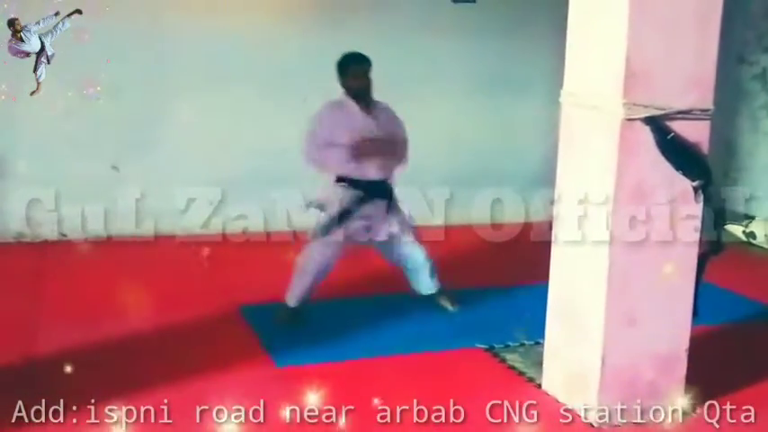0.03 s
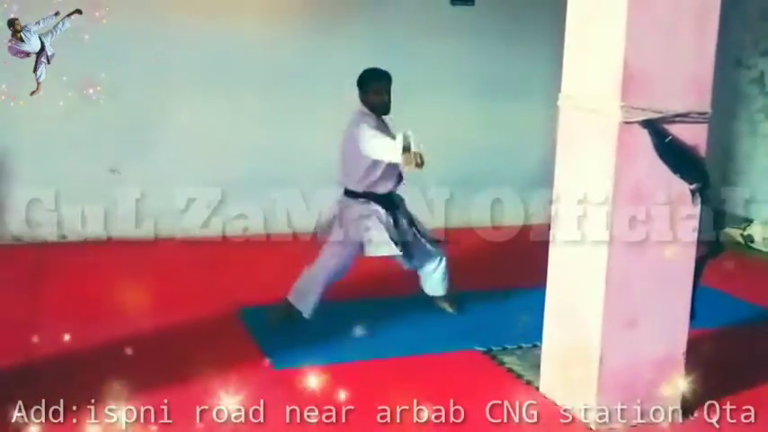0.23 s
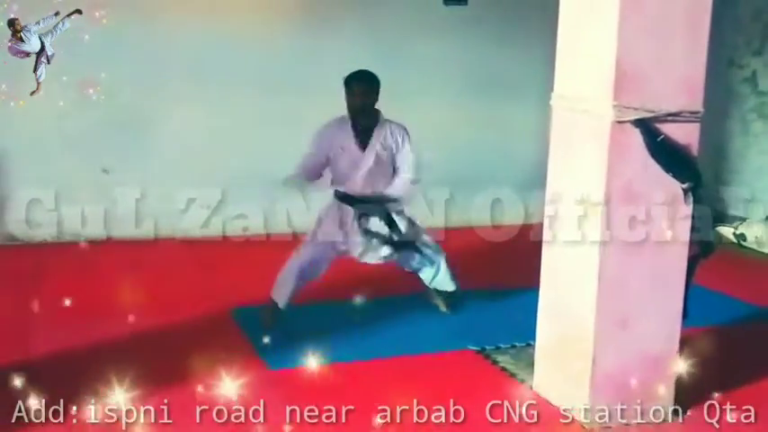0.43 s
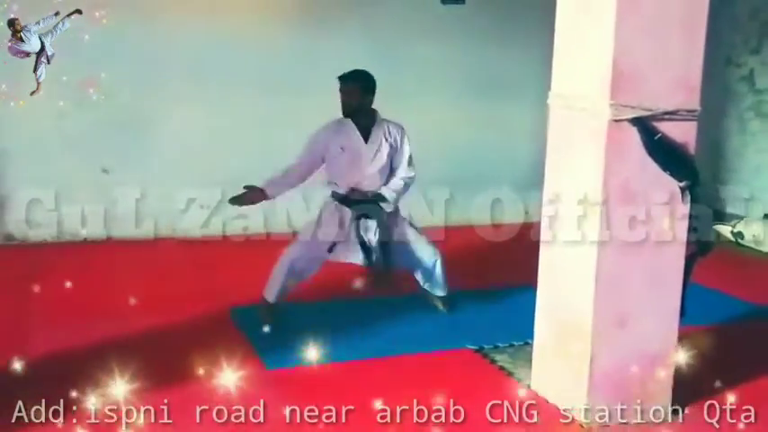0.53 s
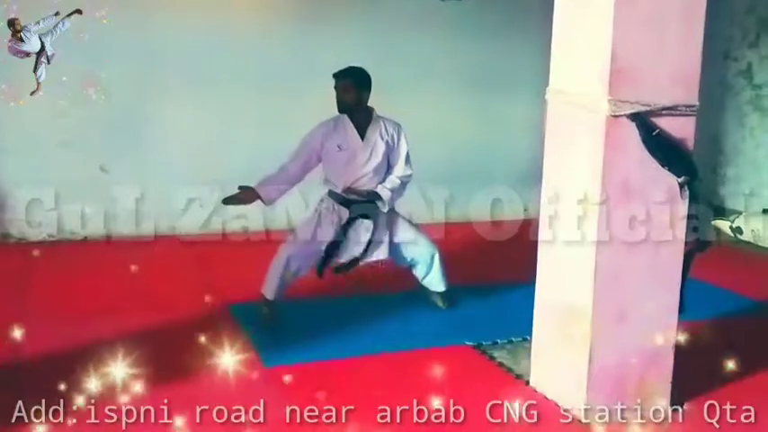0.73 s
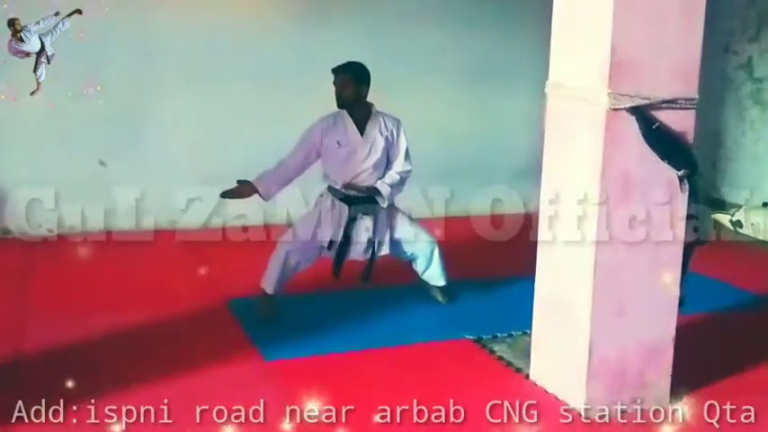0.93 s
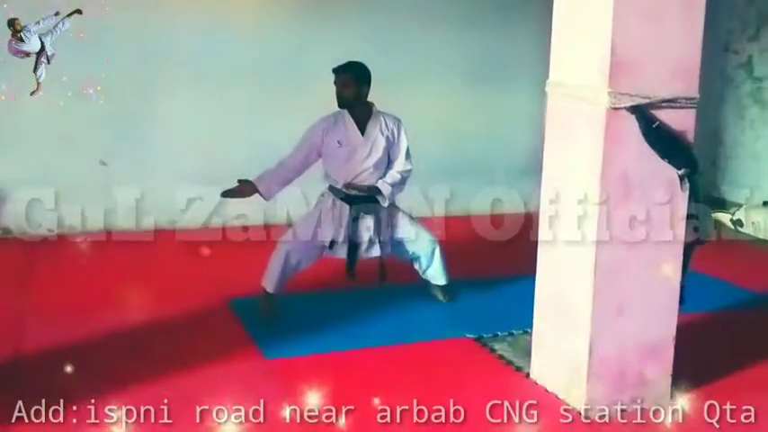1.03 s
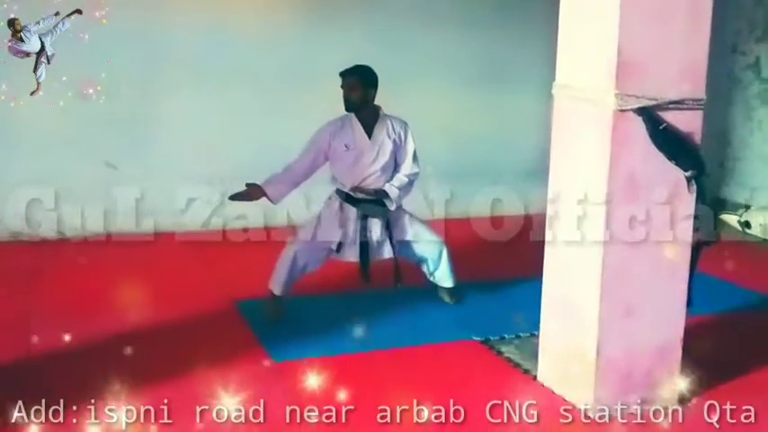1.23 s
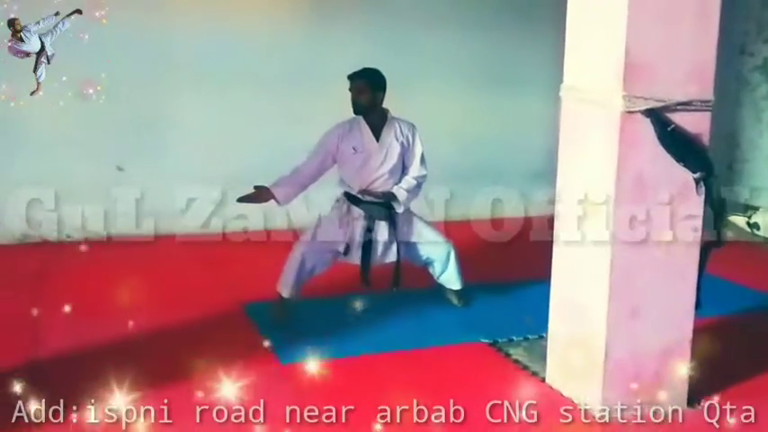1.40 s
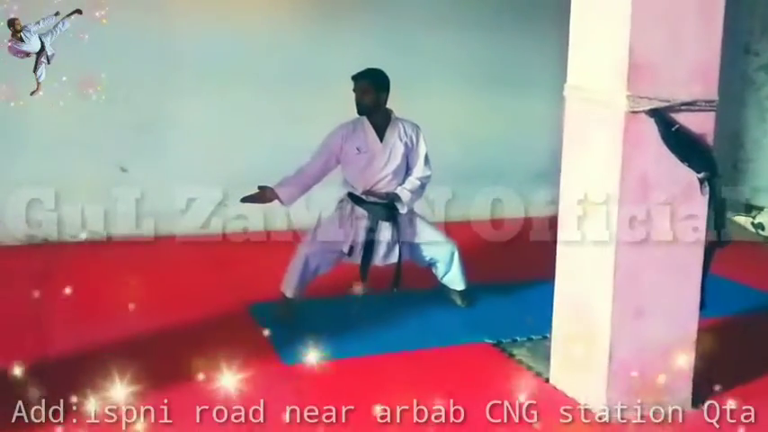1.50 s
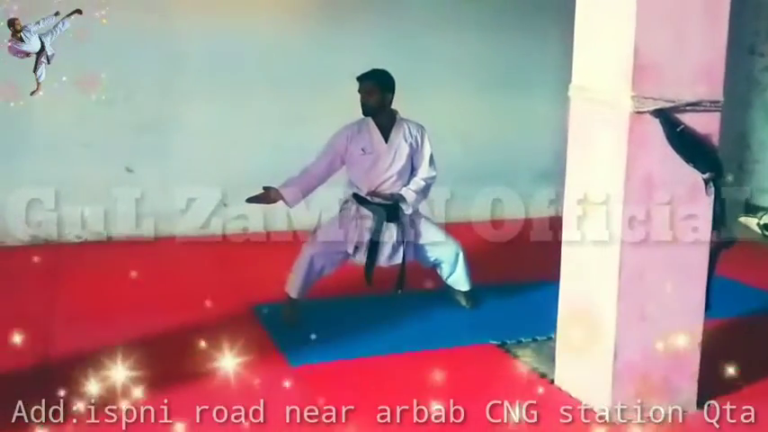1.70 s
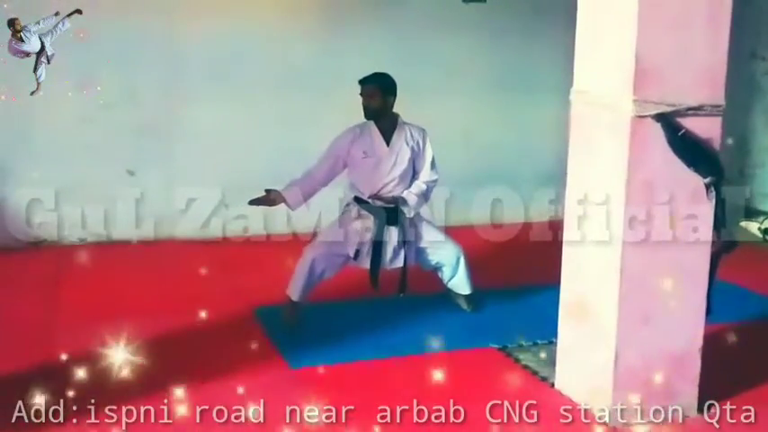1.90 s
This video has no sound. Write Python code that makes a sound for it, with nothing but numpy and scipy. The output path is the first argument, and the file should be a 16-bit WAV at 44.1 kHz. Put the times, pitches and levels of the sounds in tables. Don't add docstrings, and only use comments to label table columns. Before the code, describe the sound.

Two sharp cloth cracks with hollow air puffs and soft foot thuds, ringing in a bare hall

```python
import sys
import numpy as np
from scipy import signal
from scipy.fft import rfft, irfft
from scipy.io import wavfile
from scipy.ndimage import uniform_filter1d

SR = 44100
rng = np.random.default_rng(int(sys.argv[2]) if len(sys.argv) > 2 else 0)


def makeup_ratio(level_db):
    decades = np.asarray(level_db, float) / 20
    return 10 ** decades


def dump_mix(stems):
    frames = np.atleast_2d(stems).T
    limited = np.clip(frames, -1, 1)
    pcm = np.round(limited * 32767).astype(np.int16)
    wavfile.write(sys.argv[1], SR, pcm)


N = 85995
T = np.arange(N) / SR
HZ = np.maximum(np.fft.rfftfreq(2 * N, 1 / SR), 1)


def rms_one(x):
    return x / np.sqrt(np.mean(x ** 2) + 1e-20)


def at_hz(points, hz):
    table_hz, values = np.array(points).T
    return np.interp(np.log(hz), np.log(table_hz), values)


def shape(x, gain):
    return irfft(rfft(x, 2 * N) * gain)[:N]


def swell(start, length, rise):
    rise = np.clip(rise, 0.02, 0.9)
    u = (T - start) / length
    return np.clip(u / rise, 0, 1) * np.exp(-2.5 * np.maximum(u - rise, 0) ** 2.52)


def drift(rate):
    r = np.exp(-80 * np.pi * rate / SR)
    draws = rng.standard_normal(N // 40 + 2002)
    slow = signal.lfilter([1], [1, -2 * r, r * r], draws)[2000:]
    return np.interp(np.arange(N) / 40, np.arange(len(slow)), rms_one(slow))


def bands(gain_of_band):
    edges = 28 * 2 ** np.arange(0, 9.4, 1 / 3)
    white = rng.standard_normal((2, N))
    out = 0
    for k, (low, high) in enumerate(zip(edges, edges[1:])):
        band_filter = signal.butter(3, [low, high], "band", fs=SR, output="sos")
        band = signal.sosfilt(band_filter, np.tile(white[k % 2], 2))[N:]
        out = out + band * gain_of_band(np.sqrt(low * high))
    return out


def traffic():
    # (frequency [Hz], level [dB per Hz])
    hum_colour = [(40, -58), (80, 3), (150, -0.5), (420, -14), (750, -26.5), (2800, -30), (5500, -45.5),
                  (15500, -49)]
    level_db, sink_db_per_s, patchy_db = -45, 2.5, 0.8
    together = drift(3)

    def band_gain(hz):
        return makeup_ratio(at_hz(hum_colour, hz) + patchy_db * (0.5 * together + drift(10)))

    hum = rms_one(bands(band_gain))
    return makeup_ratio(level_db - sink_db_per_s * (T - 2.84)) * hum


def resonance(hz, width_hz, db):
    return db / (1 + (2 * (HZ - hz) / width_hz) ** 2)


def cloth(strokes, rise):
    # (frequency [Hz], level [dB per Hz])
    fabric = [(400, 2), (700, -5), (1500, -6.5), (2500, -8.5), (3700, -9), (5500, -18.5), (7500, -25.5),
              (15500, -39)]
    # (frequency [Hz], width [Hz], lift [dB])
    peaks = [(2430, 680, 4.5), (3430, 900, -3.5), (7350, 1260, 7.5), (11000, 2000, 4.5)]
    grains_per_s, grain_spread_db = 20000, 1.5
    fold_db, fold_width = 8.5, 0.38
    treble_hz, treble_rise = 4500, 0.8
    colour_db = at_hz(fabric, HZ) + sum(resonance(*peak) for peak in peaks)
    out = 0
    for start, db, length, tilt_db, fold_hz in strokes:
        spread = np.minimum(rng.exponential(1, N), 4)
        sizes = makeup_ratio(grain_spread_db * spread) * rng.standard_normal(N)
        grains = sizes * (rng.random(N) < grains_per_s / SR)
        tilt = tilt_db * np.log2(HZ / 1500)
        fold = resonance(fold_hz, fold_width * fold_hz, fold_db)
        tone = makeup_ratio(colour_db + tilt + fold) / (1 + (450 / HZ) ** 4)
        crackle = rms_one(shape(grains, tone))
        treble = shape(crackle, 1 / (1 + (treble_hz / HZ) ** 4))
        body_part = swell(start, length, rise) * (crackle - treble)
        treble_part = swell(start, length, max(rise, treble_rise)) * treble
        out = out + makeup_ratio(db) * (body_part + treble_part)
    return out


def rustles():
    # (time [s], level [dB], length [s], brightness [dB per octave], hollow of the fold [Hz])
    rubs = [
        (.001, -51, 0.015, -5.5, 2080),
        (.125, -48, 0.073, 0, 9200),
        (1.36, -58.5, 0.033, 2, 6550),
        (1.42, -51, 0.057, 0.5, 11000),
        (1.59, -57.5, 0.13, 4, 5500),
        (1.91, -66, 0.014, 23, 9160),
    ]
    return cloth(rubs, rise=0.45)


def hall():
    # (frequency [Hz], time to fall 60 dB [s])
    hall_t60 = [(200, 2.68), (400, 1.67), (700, 0.93), (1100, 0.54), (1500, 1), (2600, 1.05), (3200, 0.87),
                (7000, 0.72), (13000, 0.39)]
    gap_s, build_s = 0.0027, 0.01
    u = np.maximum(T - gap_s, 0)
    ringing = bands(lambda hz: makeup_ratio(-60 * u / at_hz(hall_t60, hz)))
    tail = (1 - np.exp(-u / build_s)) * ringing
    return rfft(rms_one(tail) / np.sqrt(N), 2 * N)


def sleeves():
    # (time [s], level [dB], length [s], pitch [Hz])
    whoops = [(0.216, -11.5, 0.033, 400), (.169, -34, 0.02, 2215), (.21, -34.5, 0.046, 1000),
              (0.254, -27.5, 0.031, 410), (.312, -17.5, 0.021, 397), (0.345, -10, 0.0132, 448.6),
              (0.352, -18.5, 0.011, 959), (0.357, -19.5, 0.019, 1454), (.362, -20.5, 0.0158, 469.4),
              (0.463, -26.5, 0.0385, 400), (0.517, -17, 0.0377, 370), (0.67, -16.5, 0.018, 400),
              (0.698, -15.5, 0.023, 1447), (0.756, -20.5, 0.065, 400), (0.802, -21, 0.021, 378.7),
              (0.867, -25.5, 0.0216, 410), (0.919, -33.5, 0.038, 400), (0.986, -33.5, 0.0587, 397.5)]
    glide_hz = 90.16
    out = 0
    for start, db, length, hz in whoops:
        u = np.clip((T - start) / length, 0, 1)
        phase = 2 * np.pi * np.cumsum(hz + glide_hz * (u - 0.5)) / SR
        out = out + makeup_ratio(db) * np.sin(np.pi * u) * np.sin(phase)
    return out


def snaps():
    # (time [s], level [dB], length [s], brightness [dB per octave], hollow of the fold [Hz])
    cracks = [
        (.17, -42, .025, 1, 2470),
        (.204, -34, 0.026, 1.5, 10400),
        (.21, -30.5, 0.041, -3.5, 3040),
        (.258, -27.5, 0.044, -4, 1225),
        (.352, -17.5, 0.02, 3.1, 1510),
        (.39, -29.5, 0.14, -0.95, 1620),
        (.648, -23.5, 0.02, 0, 1290),
        (.692, -19, 0.026, 1.65, 1450),
        (.76, -35, 0.15, -3.5, 1640),
    ]
    return cloth(cracks, rise=0.31)


def feet():
    # (time [s], level [dB], pitch [Hz])
    stamps = [(0.187, -22.5, 307.5), (.23, -24, 197), (0.272, -17.5, 259), (.36, -32, 595), (.3, -24, 130),
              (.44, -15.5, 169.3), (0.501, -22, 259), (0.682, -22.5, 269), (.7, -27, 582),
              (0.721, -22.5, 119.6), (.84, -27.5, 139), (0.801, -24, 228), (1.471, -25.5, 146.2)]
    t60_s, soft_s = 0.055, 0.0019
    out = 0
    for start, db, hz in stamps:
        u = np.maximum(T - start, 0)
        onset = 1 - np.exp(-u / soft_s)
        out = out + makeup_ratio(db - 60 * u / t60_s) * onset * np.sin(2 * np.pi * hz * u)
    return out


def horn():
    # (frequency [Hz], level [dB])
    partials = [(1050, -62.5), (2099, -76)]
    start_s, rise_s = 1.745, 0.03
    tone = sum(np.sqrt(2) * makeup_ratio(db) * np.sin(2 * np.pi * hz * T) for hz, db in partials)
    return tone * makeup_ratio(drift(9) / 2) * np.clip((T - start_s) / rise_s, 0, 1)


def scene():
    rubs, puffs, cracks, thuds = rustles(), sleeves(), snaps(), feet()
    direct = rubs + puffs + cracks + thuds
    sent = makeup_ratio(1) * rubs + makeup_ratio(-3.6) * puffs + makeup_ratio(3.5) * cracks + makeup_ratio(1.5) * thuds
    return (traffic() + direct + shape(sent, hall()) + horn())[None]


def roll_off(x):
    return signal.sosfilt(signal.butter(12, 15620, fs=SR, output="sos"), x)


def record(dry):
    # (above frequency [Hz], change [dB])
    treble_steps = [(3900, -5), (7800, -0.5)]
    low_cut_hz, top_hz = 99, 15620
    limit_db, limit_share, release_db_per_s, attack_s = -6, 0.3, 58, 0.004
    x = signal.sosfilt(signal.butter(3, low_cut_hz, "high", fs=SR, output="sos"), dry[0])
    loss_db = sum(db / (1 + np.exp(np.clip((hz - HZ) / 40, -50, 50))) for hz, db in treble_steps)
    x = shape(x, makeup_ratio(loss_db) * (HZ < top_hz))
    level_db = 10 * np.log10(uniform_filter1d(x ** 2, size=441) + 1e-12)
    release = release_db_per_s * T
    held_db = np.maximum.accumulate(level_db + release) - release
    r = np.exp(-1 / (attack_s * SR))
    cut_db = signal.lfilter([1 - r], [1, -r], limit_share * np.maximum(held_db - limit_db, 0))
    return roll_off((x * makeup_ratio(-cut_db))[None])


dry = scene()
out = record(dry)
dump_mix(out)
```